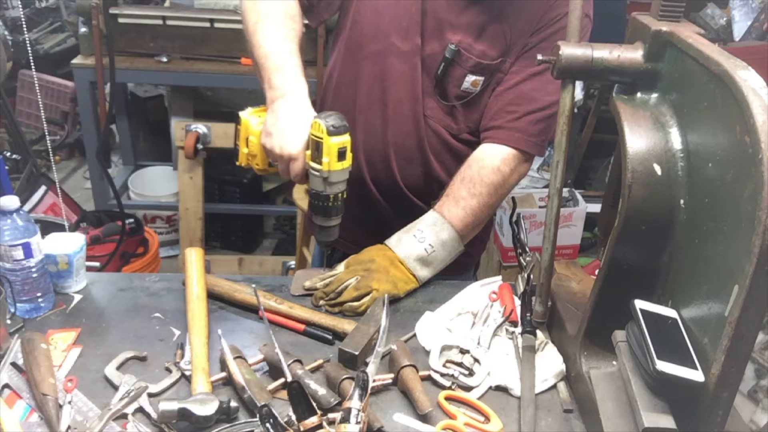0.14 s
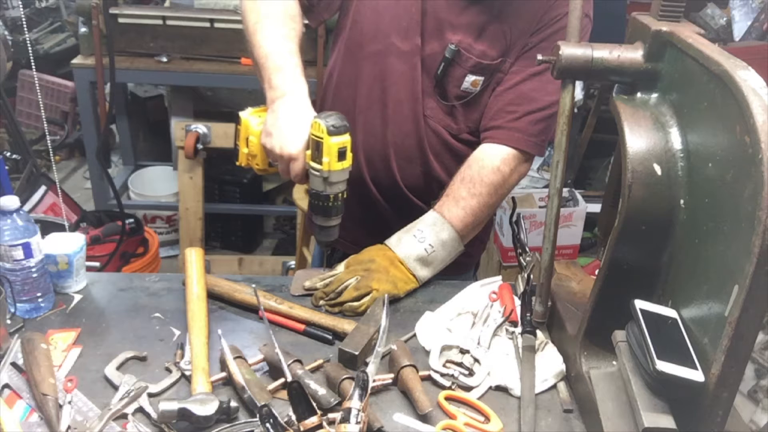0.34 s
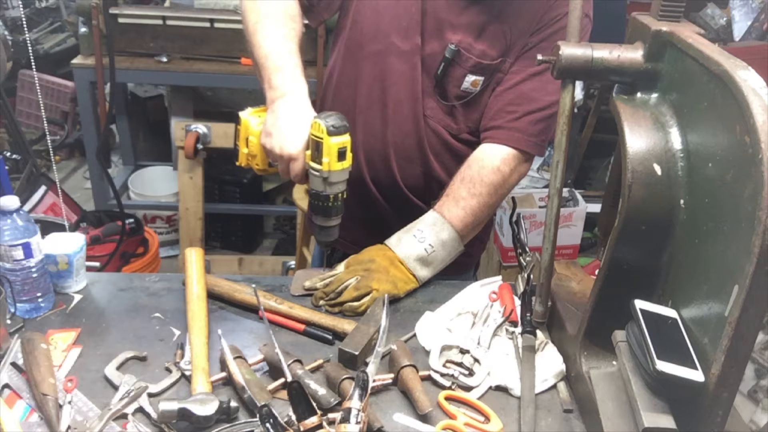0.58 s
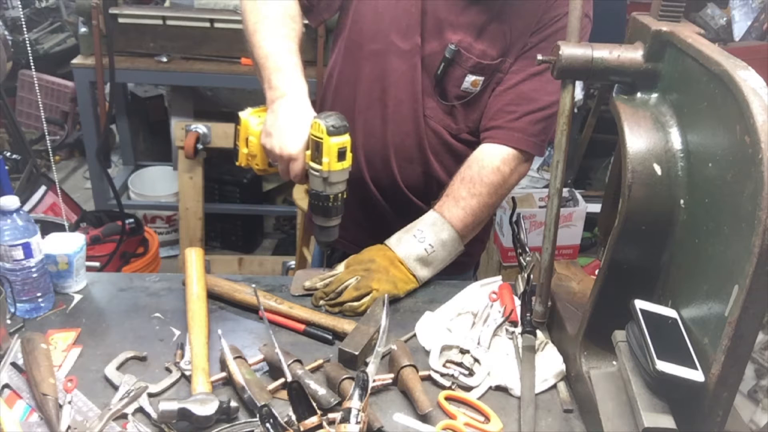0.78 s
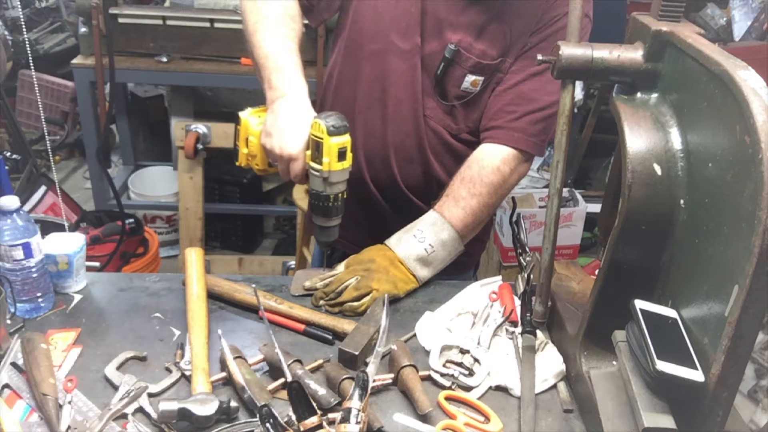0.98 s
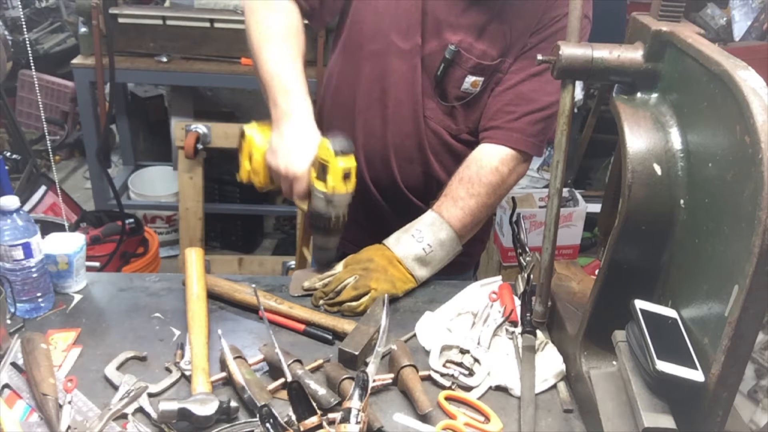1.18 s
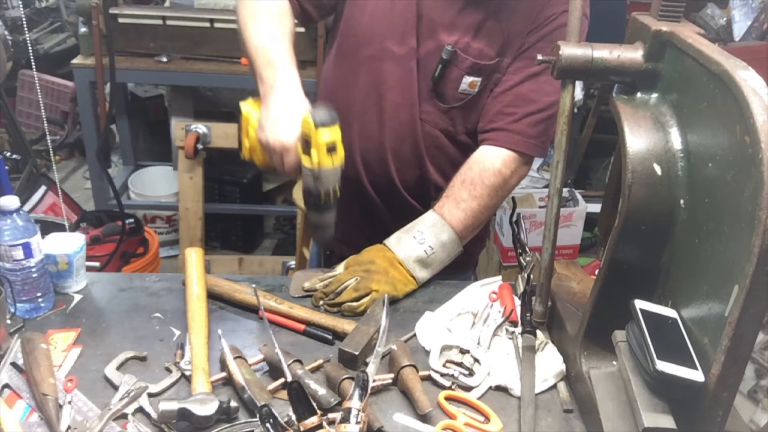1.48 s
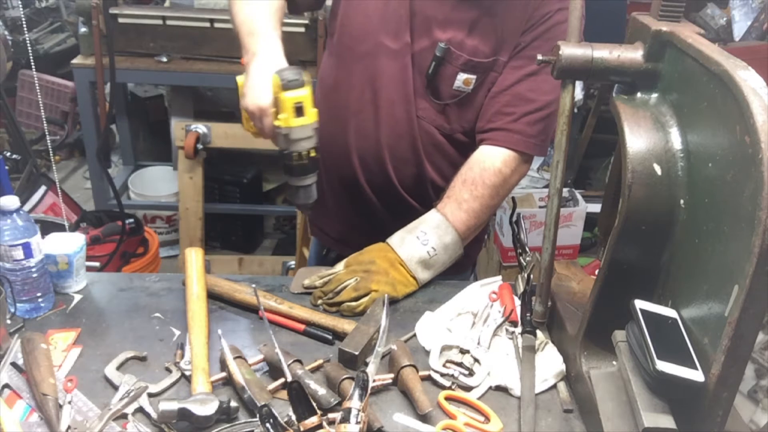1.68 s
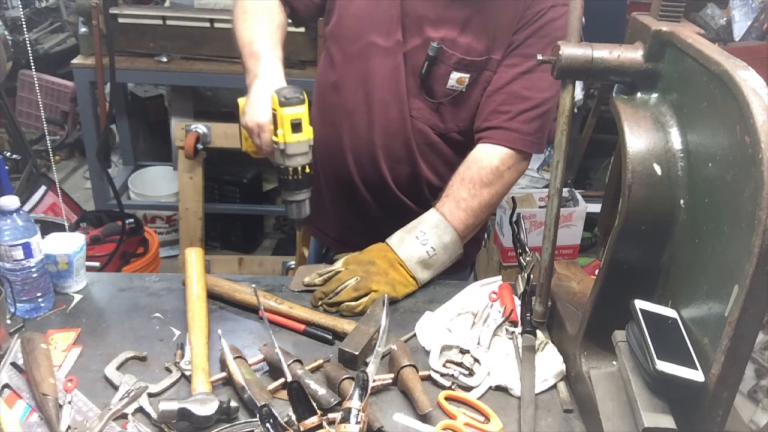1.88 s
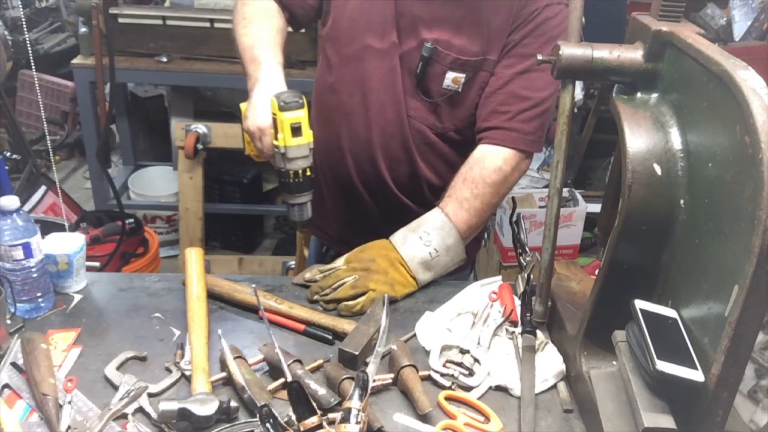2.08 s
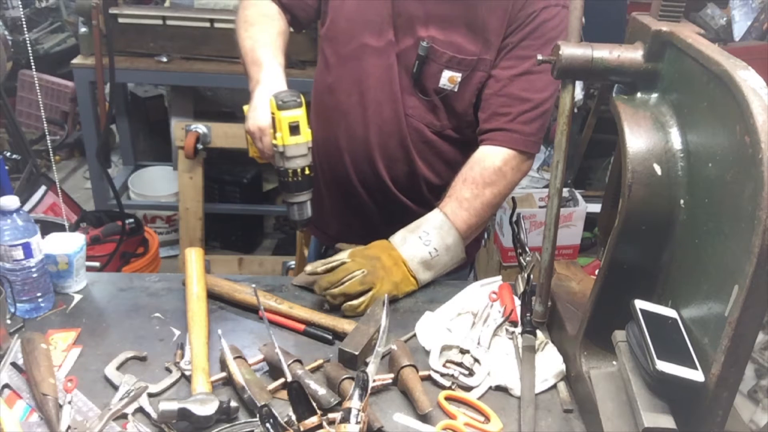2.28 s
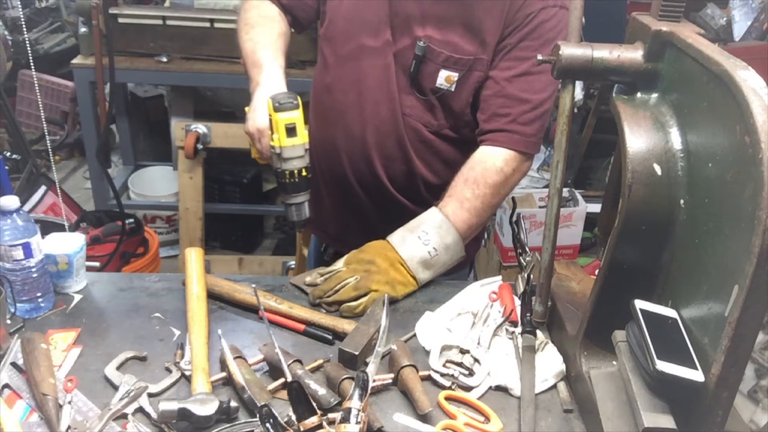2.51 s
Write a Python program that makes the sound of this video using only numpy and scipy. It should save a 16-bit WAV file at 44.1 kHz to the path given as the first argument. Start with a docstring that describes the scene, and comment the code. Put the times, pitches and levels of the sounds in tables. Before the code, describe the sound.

Close up in a quiet room, a cordless drill whines and rattles, speeds up slightly and stops abruptly. Then a steel plate slides over a metal bench, squealing briefly twice amid soft rubs and ticks.

```python
"""At a steel workbench in a quiet room, a cordless drill runs in a hole in a steel plate. Its motor and
gears whine over a dense gear rattle. It is drawn out, speeds up a little and brakes with a clatter of
the chuck, the clamp that holds the bit. A gloved hand then shoves the plate across the bench: the steel
sticks and slips, making two short screeches, with softer rubs, knocks and ticks around them."""
import sys
import numpy as np
from scipy import signal
from scipy.fft import rfft, irfft, next_fast_len
from scipy.io import wavfile

SR = 44100
rng = np.random.default_rng(int(sys.argv[2]) if len(sys.argv) > 2 else 0)


def wav_out(sig):
    """Save sig, one row per channel (or a flat mono array), as 16-bit PCM at SR to the path in sys.argv[1]."""
    wavfile.write(sys.argv[1], SR, np.round(np.clip(np.atleast_2d(sig).T, -1, 1) * 32767).astype(np.int16))


N = 116865
TIME = np.arange(N) / SR
GEAR_TEETH, BRAKE_AT_S = 7, 1.651

# How fast the motor turns before braking: t/s, f/Hz (turns a second)
MOTOR_SPEED = [(0.0, 293.7), (0.14, 294.4), (0.18, 292.1), (0.39, 293.5), (0.45, 291.5), (0.55, 292.5),
               (0.76, 292.1), (0.96, 290.6), (1.06, 292.6), (1.17, 286.3), (1.24, 294.1), (1.31, 291.5),
               (1.43, 298.8), (1.5, 301.0), (1.57, 302.0), (1.61, 298.7), (1.65, 289.9)]
def drill(brake_s=.038, pull_at_s=1.136, pull_s=0.1, jitter=0.00088):
    """One motor drives the whine and the rattle. Both change as the bit is pulled free."""
    braking = np.clip((TIME - BRAKE_AT_S) / brake_s, 0, 1)
    free = np.clip((TIME - pull_at_s) / pull_s, 0, 1)
    speed = np.interp(TIME, *np.transpose(MOTOR_SPEED)) * (1 - braking)
    angle = 2 * np.pi * np.cumsum(speed * (1 + jitter * drift(27))) / SR
    return whine(speed, angle, free, braking) + gear_rattle(angle, free)


# Motor and gear tones: multiple of the speed, level in the hole/dB, level running free/dB
MOTOR_TONES = [(1, -65, -60), (2, -70, -66), (7, -50.5, -52), (13, -60, -54), (14, -46, -50.5),
               (16, -59, -56), (17, -58, -51), (21, -48, -53), (22, -59, -62), (28, -64, -55),
               (29, -65, -62), (34, -66, -65), (35, -68, -65)]
# The gear tone swells as the motor slows: t/s, extra level/dB
GEAR_TONE_SWELL = [(1.57, 0), (1.62, 8), (1.647, 9), (1.654, 12), (1.667, 8), (1.68, 0)]
def whine(speed, angle, free, braking, flutter_db=2.04):
    """Spinning parts sing at multiples of the motor speed, sinking and fading as it brakes."""
    out, swell_db = 0, np.interp(TIME, *np.transpose(GEAR_TONE_SWELL))
    for multiple, hole_db, free_db in MOTOR_TONES:
        level_db = hole_db + free * (free_db - hole_db) + flutter_db * drift(14)
        level_db += swell_db * (multiple == GEAR_TEETH)
        fade = np.clip(multiple * speed / speed.max(), 0, 1) ** 2 * np.sqrt(1 - braking)
        tone = np.sqrt(2) * np.sin(multiple * angle + rng.uniform(0, 2 * np.pi))
        out += from_db(level_db) * fade * tone
    return out


# Tone colour of the rattle, with the bit in the hole and out of it: f/Hz, relative level/dB
HOLE_COLOUR = [(240, -34), (400, -21.5), (474, -13.5), (635, -15), (775, -10.5), (877, -16.5), (976, -12.5),
               (1070, -19), (1250, -14), (1890, -7.5), (2110, -3.5), (2490, -7), (3390, -10), (4080, -1.5),
               (4340, -3.5), (4830, -2), (5220, -9), (6000, -6.5), (7670, -12), (9660, -8), (10400, -15.5),
               (11400, -13), (12500, -18.5), (14000, -5.5), (15800, -17)]
FREE_COLOUR = [(240, -49), (400, -21), (481, -18), (536, -14.5), (588, -16), (740, -14.5), (863, -13.5),
               (932, -17), (1010, -16), (1160, -16.5), (1390, -8), (1890, -6), (2170, -3), (2490, -5.5),
               (2690, -4.5), (3290, -9), (4080, -3.5), (6380, -6.5), (7670, -10), (8410, -7.5),
               (12700, -17.5), (14600, -9.5), (15800, -18)]
def gear_rattle(angle, free, tooth_depth=0.22, turn_depth=0.04, fall_db_per_s=303):
    """Gear contacts make a noise that pulses with each tooth and each turn, and dies on braking."""
    pulse = 1 + tooth_depth * np.cos(GEAR_TEETH * angle) + turn_depth * np.cos(angle)
    contacts = rng.standard_normal(N) * pulse * from_db(0.88 * drift(200))
    treble_hollow = signal.iirnotch(12800, Q=42, fs=SR)
    contacts = low_cut(signal.lfilter(*treble_hollow, contacts), hz=307)
    in_hole = (1 - free) * from_db(-34.5) * colour(contacts, HOLE_COLOUR)
    in_air = free * from_db(-35.5) * colour(contacts, FREE_COLOUR)
    return (in_hole + in_air) * from_db(-fall_db_per_s * np.maximum(TIME - BRAKE_AT_S, 0))


def bit_rub():
    """The bit chafes on the rim of the hole as it leaves: a short, hoarse note."""
    loudness = from_db(-44) * stroke(start=1.23, rise=0.054, hold=0.071, fall_db_per_s=150)
    return loudness * band(hz=2220, width_hz=120)


# Clacks of the chuck: t/s, level/dB, centre f/Hz, time to fade by 60 dB/s
CHUCK_CLACKS = [(1.6546, -29, 5800, 0.018), (1.668, -30, 1930, 0.02), (1.677, -27.5, 1680, 0.055),
                (1.6827, -34.5, 506, 0.059), (1.712, -33.5, 1490, 0.018)]
# Steel that rings on: t/s, f/Hz, level/dB, time to fade by 60 dB/s
STEEL_RINGS = [(1.69, 2540, -50.5, .3), (1.69, 5604, -56, 0.36), (1.69, 813, -51.5, 0.24),
               (1.801, 2530, -51, 0.14), (1.8, 5604, -58, 0.38)]
def chuck():
    """The chuck clacks as its shaft locks, and the steel rings faintly afterwards."""
    clacks = sum(from_db(db) * blow(t, fade) * band(hz, 0.87 * hz) for t, db, hz, fade in CHUCK_CLACKS)
    rings = sum(from_db(db) * blow(t, fade) * np.sin(2 * np.pi * hz * TIME)
                for t, hz, db, fade in STEEL_RINGS)
    return low_cut(clacks, hz=355) + rings


# The plate's own notes: f/Hz, width/Hz, relative level in shove 1/dB, in shove 2/dB,
# delay as a share of rise plus hold (below zero, the note ends early instead)
PLATE_NOTES = [(2576, 12, -2, 2, 0), (2665, 35, -8, -9, .05), (2857, 35, -18, -14, .1),
               (3100, 35, -20, -14, 0), (4360, 18, -28, -6, -.15), (4695, 35, -8, -11, 0),
               (5118, 30, -7, -12, .05), (5330, 130, -14, -20, .4), (5790, 25, -18, -16, .3),
               (7030, 70, -24, -15, .3), (7395, 30, -24, -9, .1), (8005, 35, -25, -21, 0),
               (8880, 80, -15, -18, .25), (10245, 22, -15, -13, .3), (10610, 60, -22, -19, .1),
               (11850, 90, -18, -24, .2), (12480, 50, -22, -21, .15), (12850, 90, -19, -26, .2),
               (14000, 40, -32, -27, .3), (14800, 40, -22, -19, .15), (15290, 60, -27, -22, .1)]
# Shoves: t/s, rise/s, hold/s, fall/(dB/s), squeal level/dB, grit level/dB
PLATE_SHOVES = [(1.899, 0.0032, 0.012, 697, -24, -28), (2.22, .028, 0.046, 609, -18, -30)]
# Tone colour of steel grinding on steel: f/Hz, relative level/dB
GRIT_COLOUR = [(150, -19), (400, -3), (1200, -8.5), (2100, -4), (3000, 11), (4000, 1.5), (5400, 5.5),
               (6500, 0.5), (9300, -2.5), (11300, -8), (15500, -11)]
def screeches(steadiness=.85, flutter_db=2.2, grit_lag_s=0.0072):
    """Fast sticking and slipping makes the plate squeal at its own notes, over a gritty scrape."""
    squeal, unevenness = 0, np.sqrt(chatter())
    for hz, width_hz, *levels_db, delay in PLATE_NOTES:
        ring = signal.hilbert(resonate(slips(), hz, width_hz), next_fast_len(N))[:N]
        steady = ring.real / (np.abs(ring) + .014) ** steadiness  # slipping evens out the loudness
        note = resonate(steady, hz, width_hz=170)
        note = rms_one(note * from_db(flutter_db * drift(73)))
        for (t, rise, hold, fall, squeal_db, _), db in zip(PLATE_SHOVES, levels_db):
            shift = delay * (rise + hold)
            loudness = stroke(t + max(shift, 0), rise, hold + min(shift, 0), fall)
            squeal += from_db(squeal_db + db) * loudness * note
    squeal = low_cut(squeal, hz=2120)  # little of the squeal lies below its lowest note
    grit_loudness = sum(from_db(db) * stroke(t, rise, hold + grit_lag_s, fall)
                        for t, rise, hold, fall, _, db in PLATE_SHOVES)
    return (squeal + grit_loudness * colour(slips(), GRIT_COLOUR)) * unevenness


# The plate taps the bench: t/s, level/dB, treble tilt/(dB/octave)
PLATE_TAPS = [(1.849, -53, -1), (1.863, -51, -2), (1.9007, -28.5, -20), (1.9236, -43, 5), (1.95, -44, 4),
              (1.99, -49, -10), (2.045, -50, -16), (2.2242, -21, -0.5), (2.311, -30, -9), (2.326, -25.5, 3),
              (2.359, -34.5, -0.5), (2.403, -37.5, -4), (2.4482, -38.5, -19), (2.527, -44.5, -5),
              (2.568, -48.5, -1.5), (2.585, -51, -2)]
def taps(crack_db=-3):
    """Each tap gives a short crack and sets the plate's notes ringing for a moment."""
    out, lowest_hz = 0, PLATE_NOTES[0][0]
    for t, db, tilt in PLATE_TAPS:
        age = np.arange(N - int(t * SR))[:SR // 4] / SR
        ring = sum(from_db(note_db + tilt * np.log2(hz / lowest_hz))
                   * np.sin(2 * np.pi * hz * age + rng.uniform(0, 2 * np.pi))
                   for hz, _, _, note_db, _ in PLATE_NOTES)
        ring = np.pad(ring, (int(t * SR), N))[:N]
        tilted = [(hz, grit_db + tilt * max(np.log2(hz / lowest_hz), 0)) for hz, grit_db in GRIT_COLOUR]
        crack = from_db(crack_db) * noise(tilted)
        out += from_db(db) * (ring * blow(t, fade_s=0.054) + crack * blow(t, fade_s=0.018))
    return out


# Slides: t/s, rise/s, hold/s, fall/(dB/s), rub level/dB, thud level/dB, squeak f/Hz, squeak level/dB
SOFT_SLIDES = [(1.796, .005, 0.017, 150, -67, -60, 2530, -72),
               (1.859, 0.016, 0.012, 300, -56.5, -68, 4600, -59),
               (1.897, 0.0033, 0.027, 403, -52, -47.5, 406, -46),
               (1.987, 0.0032, 0.0051, 251, -53.5, -50, 3320, -53),
               (2.042, 0.027, 0.025, 200, -58, -74, 2600, -56),
               (2.079, 0.028, 0.045, 360, -43, -62, 4790, -49.5),
               (2.263, 0.052, 0.016, 374, -43.5, -51, 5350, -34.5),
               (2.414, 0.029, 0.0086, 598, -46.5, -46, 2970, -41),
               (2.44, 0.082, 0.011, 500, -67, -68, 3690, -51.5),
               (2.464, 0.066, 0.0073, 459, -50.5, -61, 6100, -58.5),
               (2.566, 0.0024, 0.013, 130, -57.5, -61, 2220, -56)]
# Bumps of the bench: t/s, rise/s, hold/s, fall/(dB/s), rumble level/dB, thud level/dB
BENCH_BUMPS = [(1.162, .06, 0.026, 298, -65, -45.5), (1.236, 0.027, 0.018, 302, -61, -78),
               (1.304, 0.058, 0.058, 205, -64.5, -53.5), (1.861, .035, 0.023, 140, -47, -68),
               (2.112, 0.034, .015, 191, -61, -59.5)]
# Tone colours of the rub, thud and rumble: f/Hz, relative level/dB
RUB_COLOUR = [(350, -41), (600, -7.5), (642, -12), (727, -49), (892, -6), (1240, -28), (1500, -10),
              (1720, -18), (1920, 3), (2260, -17), (3270, 0), (4130, -13), (4800, -13), (5660, -6),
              (6150, -9.5), (6860, -14.5), (8190, -19), (9650, -17.5), (11700, -28), (12500, -27),
              (15800, -25)]
THUD_COLOUR = [(60, -18), (170, -8.5), (310, 1), (480, -11.5), (620, -16), (800, -1), (1100, -8.5),
               (2000, -8), (6000, -45)]
RUMBLE_COLOUR = [(20, 0.5), (45, -7.5), (90, 3.5), (140, -12), (300, -11), (1000, -36)]
def slides_and_bumps():
    """The plate rubs and squeaks as it slides softly; the bench answers with thuds and rumbles."""
    rub, thud, rumble = colour(slips(), RUB_COLOUR), noise(THUD_COLOUR), noise(RUMBLE_COLOUR)
    slides = 0
    for *shape, rub_db, thud_db, hz, squeak_db in SOFT_SLIDES:
        squeak = from_db(squeak_db) * resonate(slips(), hz, width_hz=130)
        slides += stroke(*shape) * (from_db(rub_db) * rub + from_db(thud_db) * thud + squeak)
    bumps = sum(stroke(*shape) * (from_db(rumble_db) * rumble + from_db(thud_db) * thud)
                for *shape, rumble_db, thud_db in BENCH_BUMPS)
    return slides * chatter() + bumps


def room_echo(x, level_db=-24.5):
    """The cluttered room adds a faint, dull tail to every sound."""
    tail = dull(rng.standard_normal(N), hz=7000) * blow(0.012, fade_s=0.26)
    return from_db(level_db) * signal.fftconvolve(x, tail / np.linalg.norm(tail))[:N]


# Tone colour of the background: f/Hz, relative level/dB
HUSH_COLOUR = [(20, 0.5), (90, -9.5), (180, -6), (320, 3), (900, -10), (3000, -12), (8000, -27),
               (16000, -28)]
def hush(level_db=-63.5):
    """A faint, steady, low noise lies under everything."""
    return from_db(level_db) * noise(HUSH_COLOUR)


def slips(per_s=5000, spread_db=3.0):
    """Rubbing steel moves in many tiny jerks of uneven size."""
    sizes = from_db(spread_db * np.minimum(rng.exponential(1, N), 4)) * rng.choice([-1, 1], N)
    return sizes * (rng.random(N) < per_s / SR)


def chatter(depth_db=1):
    """The quick, random tremble in the loudness of a scrape."""
    return from_db(depth_db * drift(130))


def stroke(start, rise, hold, fall_db_per_s):
    """Loudness that rises, holds and fades."""
    falling_s = np.maximum(TIME - start - rise - hold, 0)
    return np.clip((TIME - start) / rise, 0, 1) * from_db(-fall_db_per_s * falling_s)


def blow(start, fade_s):
    """Loudness that jumps up, then drops 60 dB in fade_s."""
    return (TIME >= start) * np.exp(-np.log(1000) * np.maximum(TIME - start, 0) / fade_s)


def drift(hz):
    """A random wobble of typical size 1; hz sets how quick it is."""
    return rms_one(dull(rng.standard_normal(N + SR), hz)[SR:])


def noise(spectrum):
    """Noise with a given tone colour."""
    return colour(rng.standard_normal(N), spectrum)


def band(hz, width_hz):
    """Noise gathered around one pitch."""
    return resonate(resonate(rng.standard_normal(N), hz, width_hz), hz, width_hz)


def colour(x, spectrum):
    """Gives a sound a tone colour, at strength 1."""
    hz, db = np.transpose(spectrum)
    f = np.maximum(np.fft.rfftfreq(N, 1 / SR), 1)
    gain = from_db(np.interp(np.log(f), np.log(hz), db))
    return rms_one(irfft(rfft(x) * gain, N))


def resonate(x, hz, width_hz):
    """Makes a sound ring at one pitch, at strength 1."""
    r = np.exp(-np.pi * width_hz / SR)
    return rms_one(signal.lfilter([1, 0, -1], [1, -2 * r * np.cos(2 * np.pi * hz / SR), r * r], x))


def dull(x, hz):
    """Favours what lies below hz."""
    r = np.exp(-2 * np.pi * hz / SR)
    return signal.lfilter([1], [1, -2 * r, r * r], x)


def low_cut(x, hz):
    """Cuts away what lies below hz."""
    return signal.sosfilt(signal.butter(4, hz, "high", fs=SR, output="sos"), x)


def from_db(db):
    """Turns decibels into a multiplier."""
    return 10 ** (np.asarray(db) / 20)


def rms_one(x):
    """Scales a sound to an average strength (rms) of 1."""
    return x / np.sqrt(np.mean(x ** 2) + 1e-20)


def scene():
    """Drill, plate and bench in the quiet room, in one channel."""
    near = drill() + bit_rub() + chuck() + screeches() + taps() + slides_and_bumps()
    return (near + room_echo(near) + hush())[None]


def record(dry, dip_at_s=1.791, dip_width_s=.006, dip_db=-14, top_hz=15720):
    """The level dips briefly, and the highest treble is cut off."""
    dip = from_db(dip_db * np.exp(-((TIME - dip_at_s) / dip_width_s) ** 2))
    return signal.sosfilt(signal.ellip(12, .1, 80, top_hz, fs=SR, output="sos"), dry * dip)


dry = scene()
out = record(dry)
wav_out(out)
```